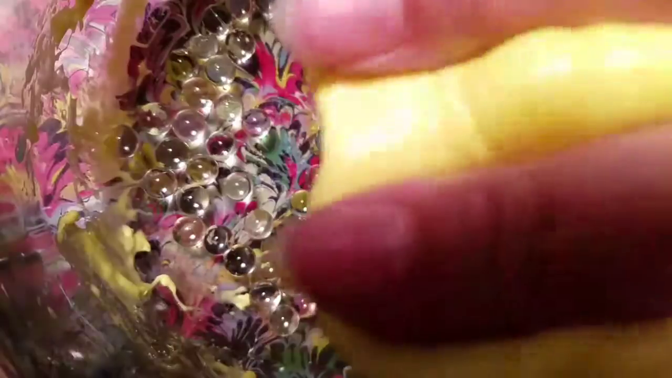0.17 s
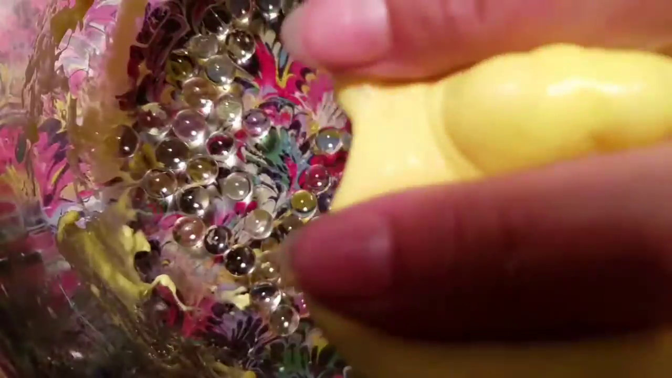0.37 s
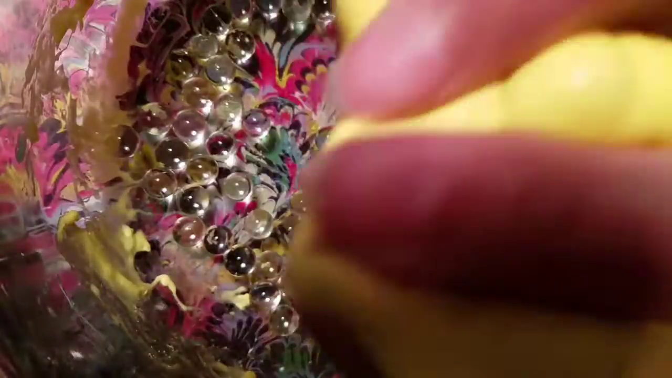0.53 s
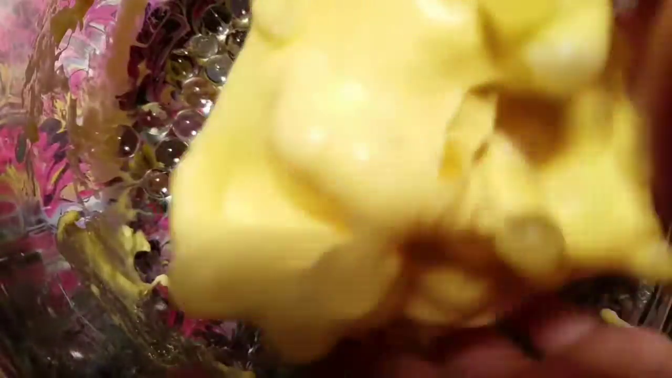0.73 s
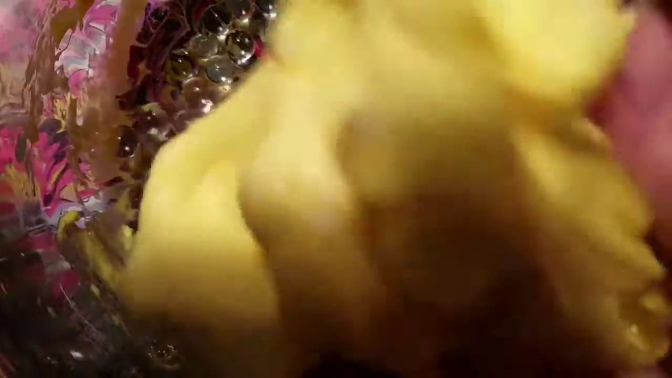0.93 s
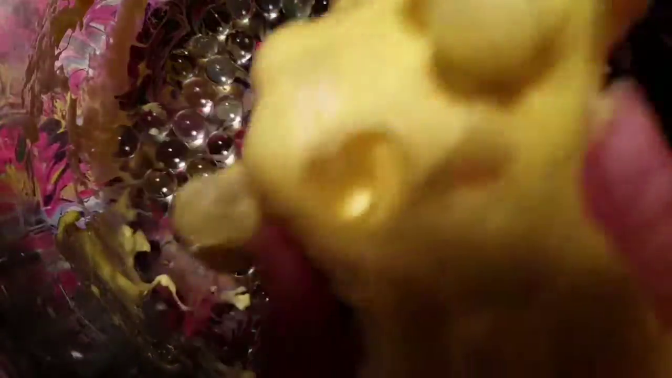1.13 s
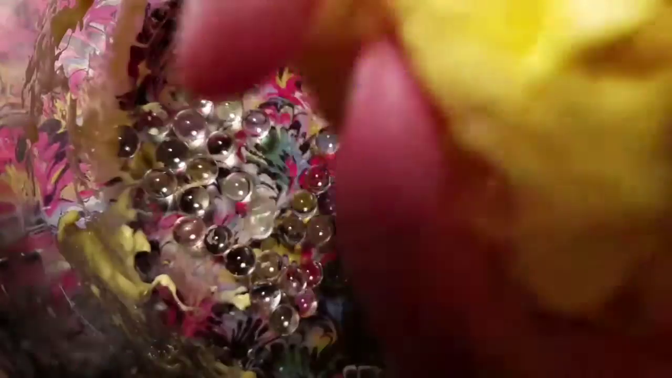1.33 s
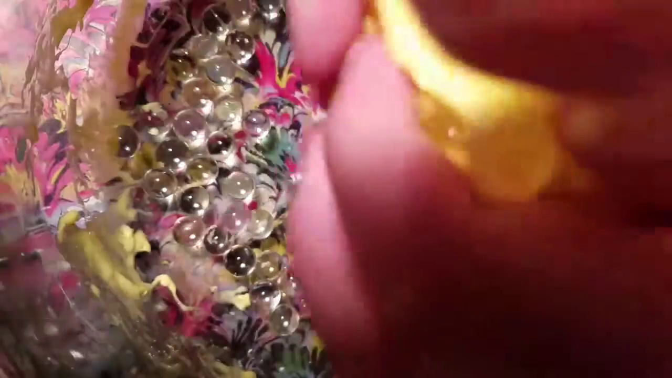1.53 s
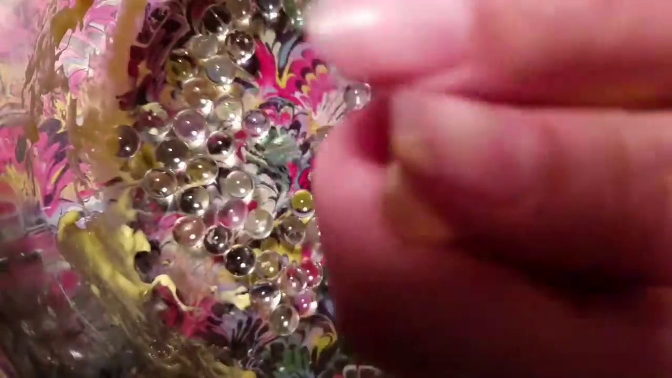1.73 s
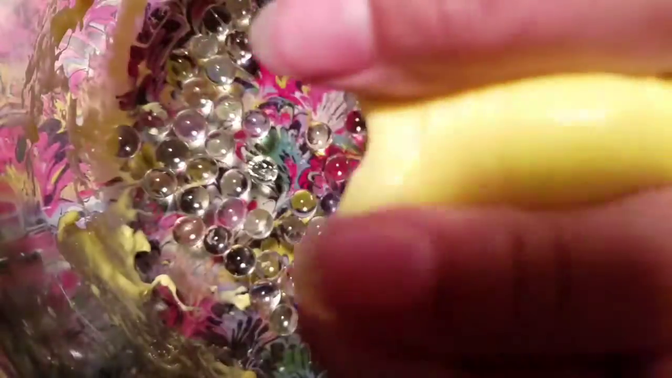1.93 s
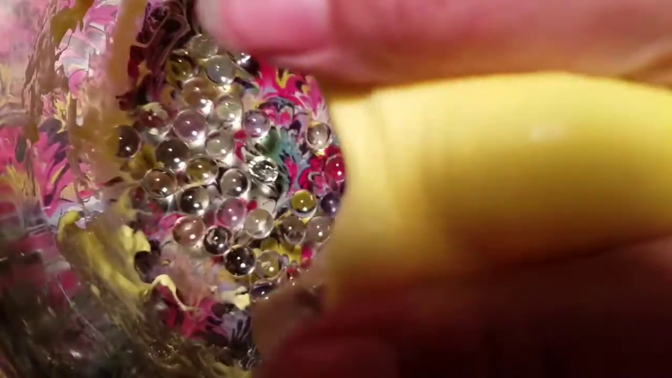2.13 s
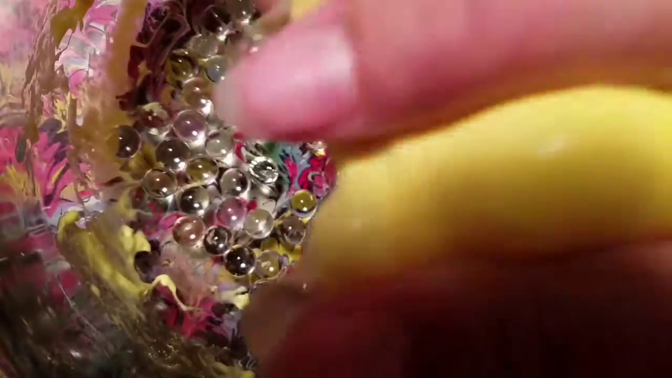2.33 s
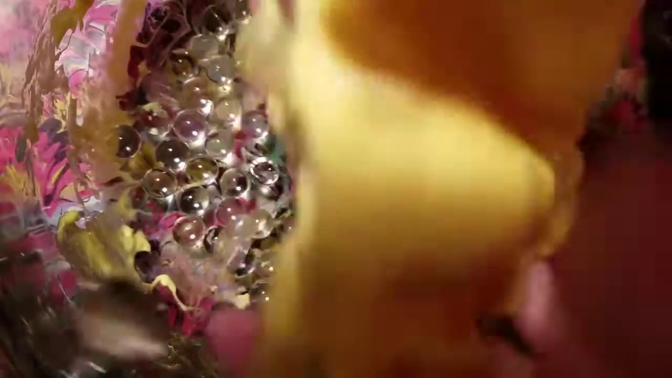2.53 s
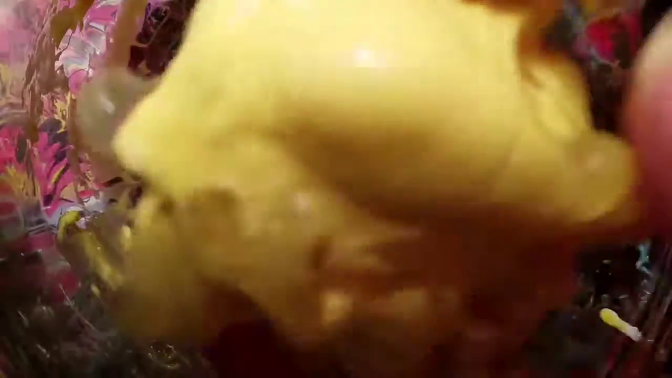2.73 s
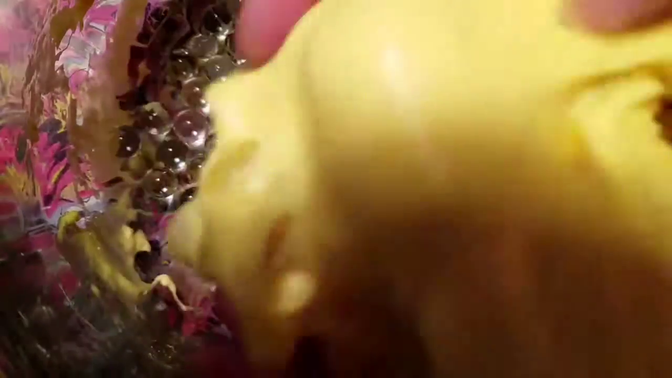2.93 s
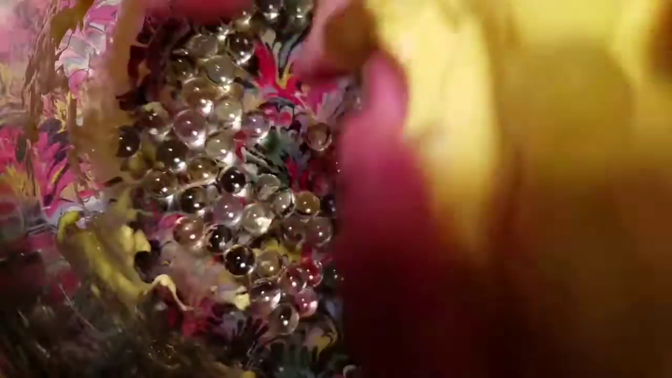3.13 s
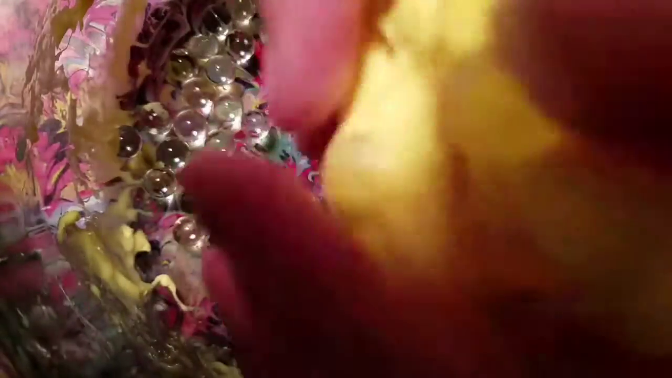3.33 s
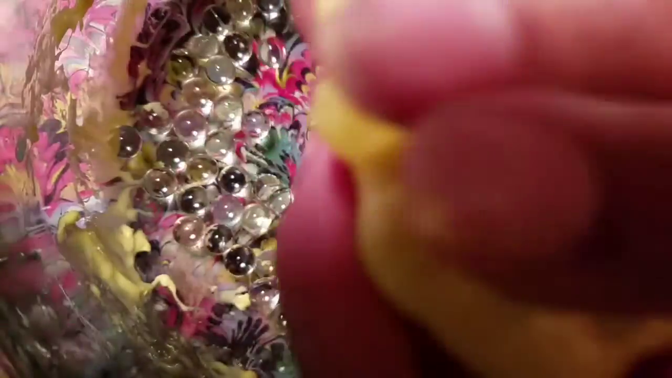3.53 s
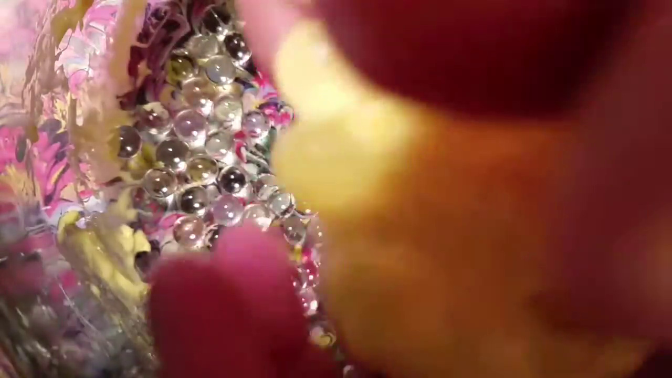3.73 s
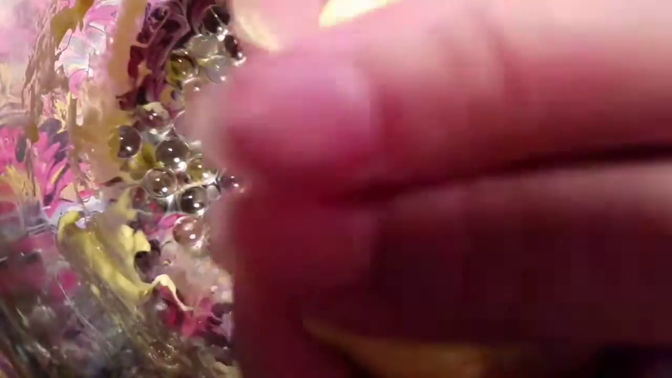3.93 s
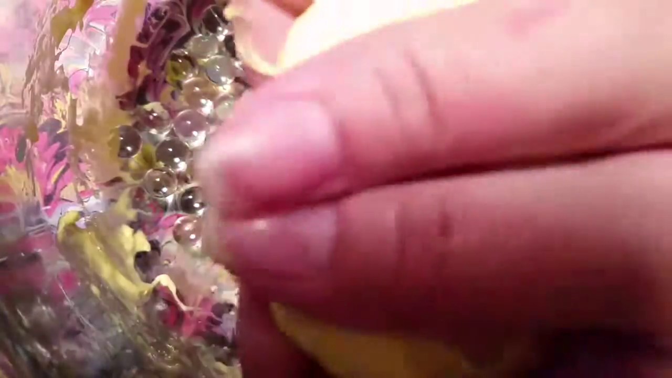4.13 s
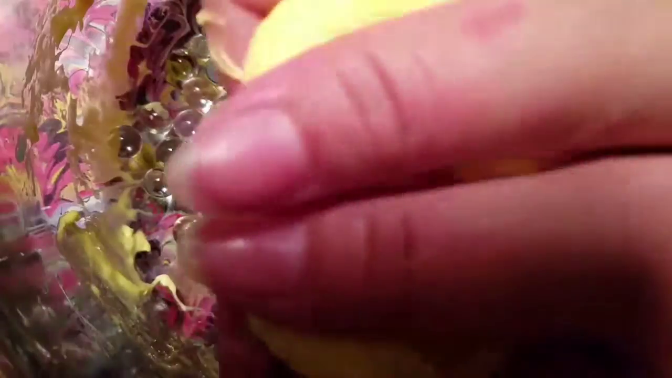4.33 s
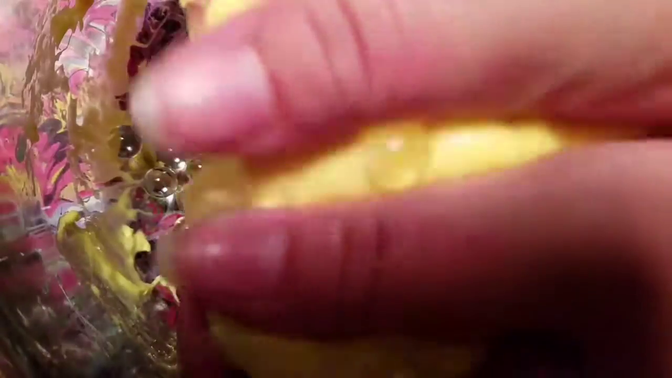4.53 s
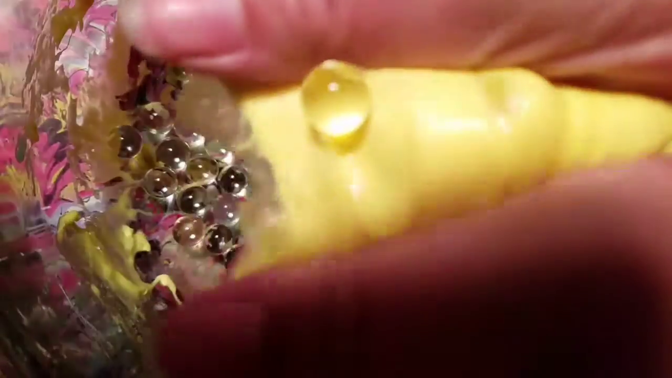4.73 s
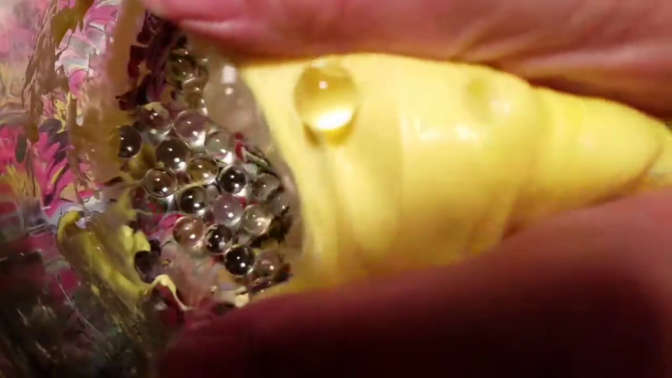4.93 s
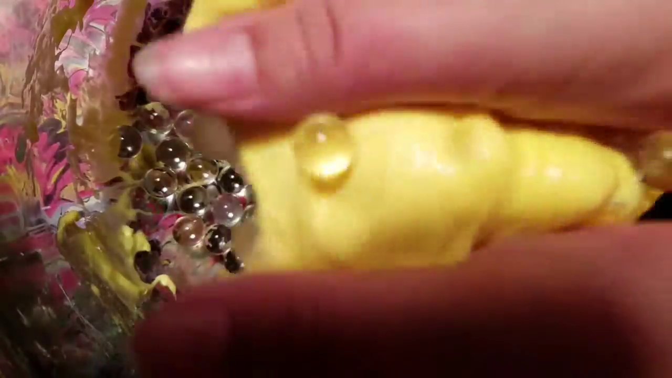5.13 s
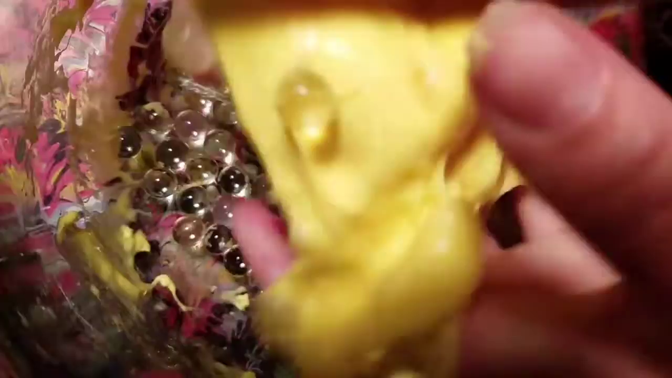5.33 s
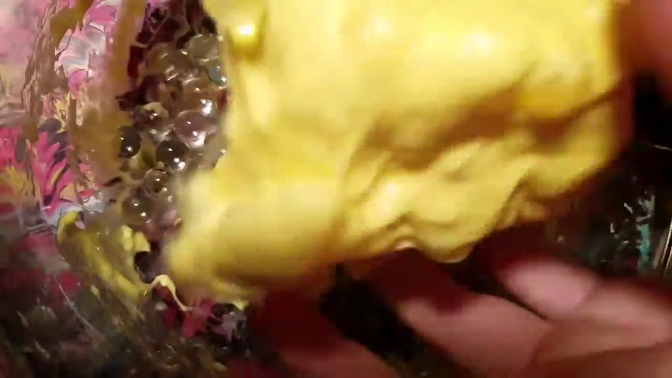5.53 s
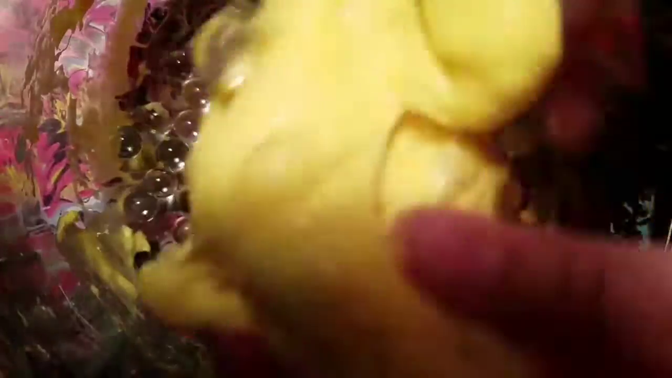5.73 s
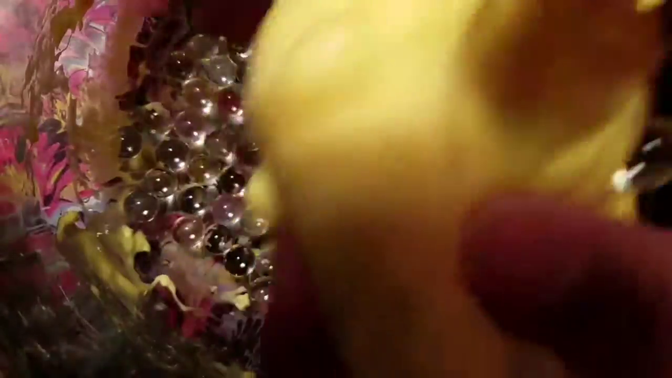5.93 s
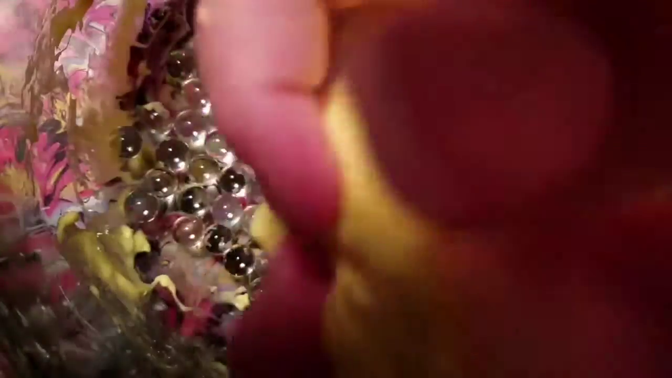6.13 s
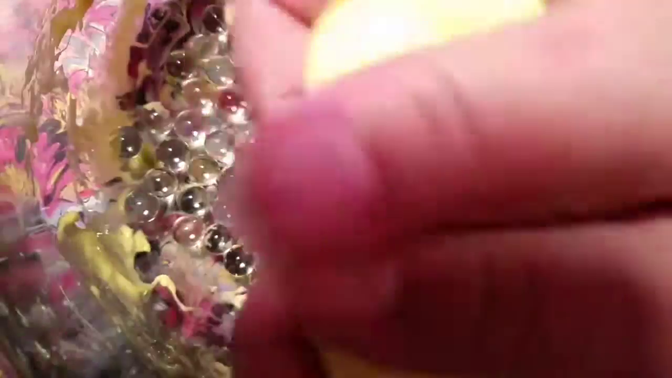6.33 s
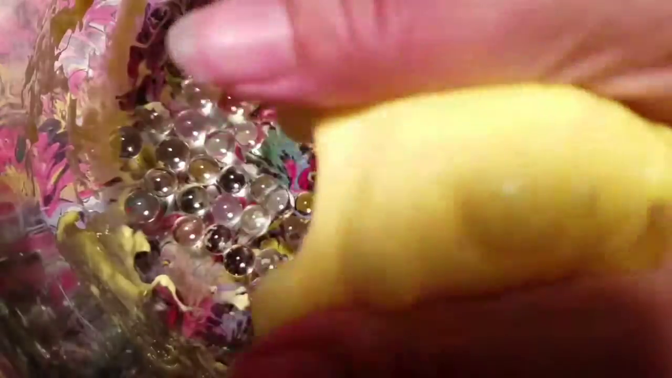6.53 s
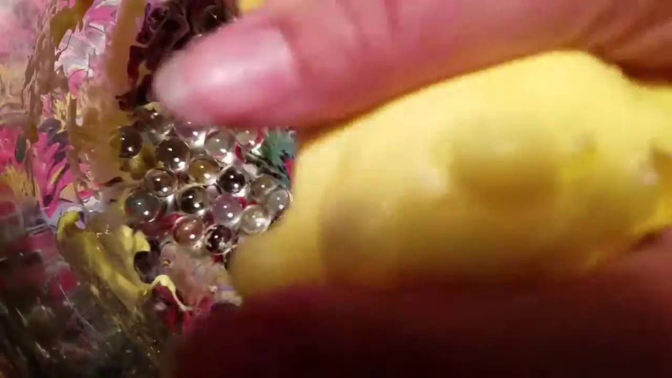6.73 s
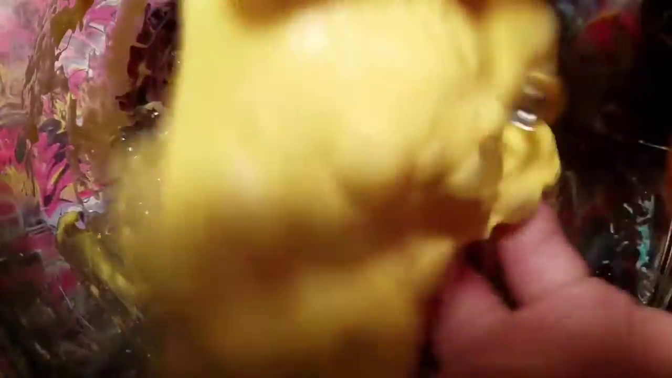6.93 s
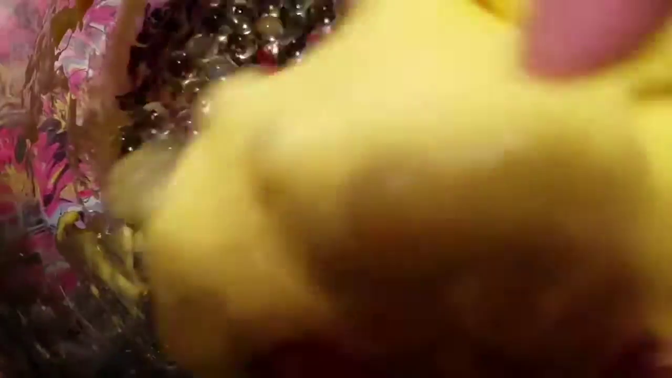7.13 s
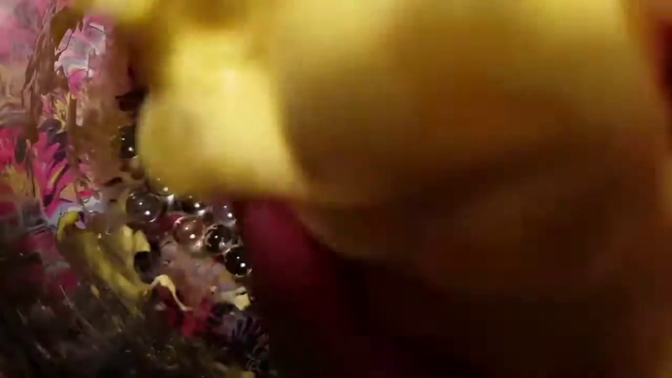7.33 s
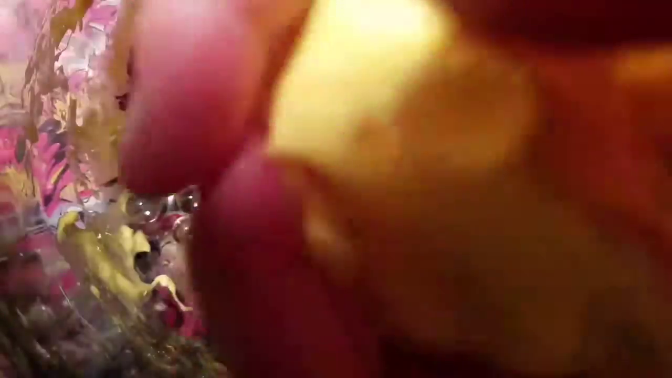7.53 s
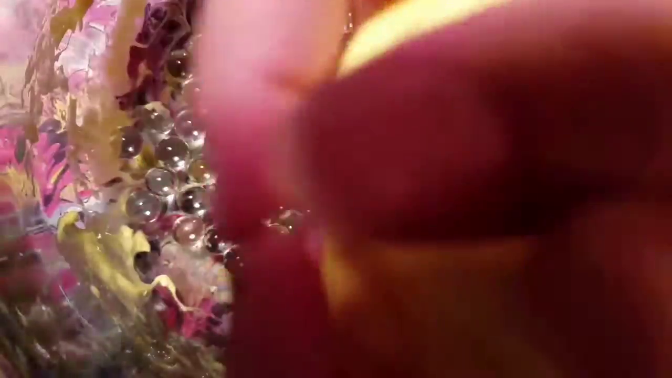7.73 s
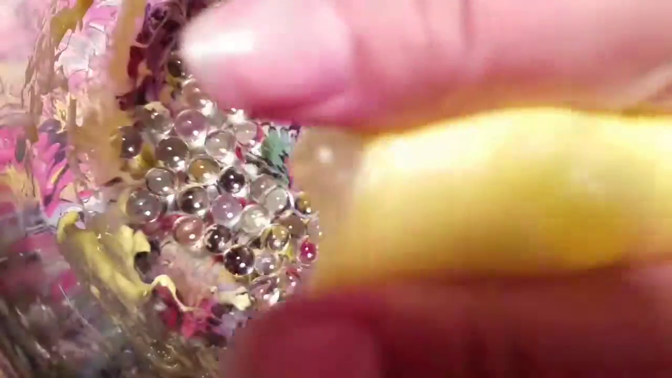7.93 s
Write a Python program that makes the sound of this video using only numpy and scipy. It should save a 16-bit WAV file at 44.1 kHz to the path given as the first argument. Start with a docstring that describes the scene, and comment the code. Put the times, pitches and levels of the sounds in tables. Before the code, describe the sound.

Close, sticky crackling and snapping air pockets as beaded slime is pressed and folded by hand in a quiet room.

```python
"""Sharp pops and a wet crackle: hands knead slime with beads in it over a glass bowl.
The place is a quiet room, with a small stereo microphone close to the hands. Trapped air pockets
burst in the pops, tiny bubbles crackle in each squeeze, and the slime fizzes as it peels off the skin.
The hollow between hands and bowl rings along. Now and then the lump bumps softly and the glass sings."""
import sys
import numpy as np
from scipy import signal
from scipy.io import wavfile

SR = 44100
rng = np.random.default_rng(int(sys.argv[2]) if len(sys.argv) > 2 else 0)


def unload_wav(signal):
    """Save mono or channel-first audio to the path in sys.argv[1] as 16-bit WAV at rate SR, clipped to [-1, 1]."""
    wavfile.write(
        sys.argv[1],
        SR,
        np.round(np.clip(np.atleast_2d(signal).T, -1, 1) * 32767).astype(np.int16),
    )


N = 356328


def from_db(db):
    """Decibels to gain."""
    return 10 ** (np.asarray(db) / 20)


def unit_rms(x):
    """Scale to an rms of 1."""
    return x / np.sqrt(np.mean(x ** 2) + 1e-20)


def band(x, low_hz, high_hz, order=2):
    """Causal band-pass."""
    sos = signal.butter(order, [low_hz, min(high_hz, .45 * SR)], "band", fs=SR, output="sos")
    return signal.sosfilt(sos, x + 1e-18)


def resonate(x, hz, width_hz):
    """One resonance with gain 1 at its peak."""
    b, a = signal.iirpeak(min(hz, .45 * SR), hz / min(width_hz, SR / 3), fs=SR)
    return signal.lfilter(b, a, x + 1e-18)


def left_first(x, lead_ms):
    """The sound reaches the microphone's right port a little after the left."""
    left, right = np.broadcast_to(x, (2, x.shape[-1]))
    at = np.arange(len(right))
    return np.array([left, np.interp(at - np.round(lead_ms * SR / 1000), at, right, left=0)])


def add(out, start_s, sound):
    """Mix a sound in at a time."""
    start = max(round(start_s * SR), 0)
    out[..., start:start + sound.shape[-1]] += sound[..., :max(N - start, 0)]


def room_air(rush_db=-59.5, hum_hz=123, hum_db=-76):
    """The quiet room all round the microphone: a steady rush with a faint mains hum."""
    # Each row: frequency in Hz, relative spectral density in dB.
    spectrum = [(25, -10), (70, -6), (125, -5), (180, -15.5), (350, -1), (620, -8), (800, -16.5),
                (1400, -23), (2600, -23.5), (4000, -32.5), (9500, -34.5), (13800, -30), (16000, -32)]
    # Each row: frequency in Hz, likeness of left and right from 0 to 1.
    likeness = [(30, 0.23), (120, 0.49), (330, 0.96), (640, 0.2), (1400, 0), (15000, 0.17)]
    edges_hz = 22 * 2 ** np.arange(0, 9.6, .5)
    white = rng.standard_normal((2, 2, N))
    rush, sides = 0, np.array([[1], [-1]])
    for k, (low, high) in enumerate(zip(edges_hz, edges_hz[1:])):
        mid, side = band(white[k % 2], low, high, order=3)
        centre = np.sqrt(low * high)
        db, alike = [np.interp(np.log(centre), np.log(hz), values)
                     for hz, values in (np.transpose(spectrum), np.transpose(likeness))]
        pan_db = 1.5 if centre > 800 else -1.6 if centre > 300 else .3
        stereo = np.sqrt(1 + alike) * mid + np.sqrt(1 - alike) * side * sides
        rush = rush + from_db(db + pan_db * sides) * stereo
    hum = np.sqrt(2) * np.sin(2 * np.pi * hum_hz * np.arange(N) / SR)
    return from_db(rush_db) * unit_rms(rush) + from_db(hum_db) * hum


def room_echoes(x, t60_s=.25, delay_s=.007):
    """The walls return a dense dying cloud of reflections, different at each port."""
    t = np.arange(int((t60_s + delay_s) * SR) + 2) / SR
    cloud = rng.standard_normal((2, len(t))) * from_db(-60 * t / t60_s) * (t >= delay_s)
    return signal.fftconvolve(x, unit_rms(cloud) / np.sqrt(len(t)), axes=1)[:, :N]


def glass_bowl():
    """A light touch leaves the bowl under the hands ringing."""
    # Each row: start in seconds, level in dB.
    touches = [(5.404, -58), (6.988, -45)]
    # Each row: frequency in Hz, gain in dB, seconds to die away by 60 dB.
    modes = [(1597, -3.5, 0.8), (2810, 1.5, 0.3)]
    out, t = np.zeros(N), np.arange(SR) / SR
    for start_s, db in touches:
        for hz, mode_db, t60_s in modes:
            add(out, start_s, from_db(db + mode_db - 60 * t / t60_s) * np.sin(2 * np.pi * hz * t))
    return left_first(out, .11)


def lump_bumps(width_hz=75):
    """The soft lump lands with a short dull thud, alike at both ports."""
    # Each row: start in seconds, level in dB, pitch in Hz.
    landings = [(0.829, -52, 226.5), (5.249, -38, 362), (5.451, -43, 340), (5.637, -67, 291.5),
                (6.928, -38, 262), (7.107, -33.5, 343)]
    out, t = np.zeros(N), np.arange(int(.1 * SR)) / SR
    for start_s, db, hz in landings:
        thud = np.sin(2 * np.pi * hz * t) * np.exp(-np.pi * width_hz * t)
        wobble = unit_rms(band(rng.standard_normal(len(t)), 204, 530)) * np.exp(-t / .028)
        add(out, start_s, from_db(db) * (thud + .2 * wobble))
    return band(out, 157, 1200)


def hollow_ring(puff, slop, hz=658, width_hz=66):
    """The air between hands and bowl rings low, over the broad slop of the slime itself; rms 1."""
    # The hollow opens towards the right port: left gain in dB, right gain in dB.
    pan_db = [-5, 6.2]
    ring = band(resonate(puff, hz, width_hz), 454, 967)
    ring = unit_rms(left_first(ring, .48) * from_db(pan_db)[:, None])
    slime = unit_rms(left_first(band(puff, 314, 1020, order=3), .1))
    return unit_rms(ring + slop * slime)


def squeeze_db(from_middle_s, length_s, swell_db=14):
    """Pressure swells to the middle of a squeeze and eases off again."""
    return -swell_db * (2 * from_middle_s / length_s) ** 2


def peel_db(age_s, hold_s, rise_db_per_s=370, sag_db_per_s=35, fall_db_per_s=210):
    """The slime lets go of the skin quickly, keeps peeling for a moment and dies away."""
    return (rise_db_per_s * np.minimum(age_s, 0) - sag_db_per_s * np.clip(age_s, 0, hold_s)
            - fall_db_per_s * np.maximum(age_s - hold_s, 0))


def kneading(resting_db=-76):
    """All strokes over the faint crackle of resting slime: squelch dB, fizz dB, where squeezes lead."""
    # Firm squeezes. Each row: middle in seconds, length in seconds, level in dB, brightness in dB.
    squeezes = [(.15, .52, -48, -1), (2.01, .52, -57, 0), (4.809, .48, -51, 0), (6.521, .42, -50, 1.5),
                (8.01, .24, -49, 0)]
    # Peeling, loud as a squeeze is let go, light while the slime is folded.
    # Each row: peak time in seconds, hold in seconds, level in dB, brightness in dB.
    peels = [(.595, .045, -40.5, -1), (.765, .03, -58, 0), (.86, .03, -63, 1), (1.032, .03, -54, -1),
             (1.32, .04, -59, 2), (1.465, .03, -58, 0), (1.635, .06, -67, 0), (2.415, .11, -46.5, 0),
             (2.81, .02, -58, 0), (2.985, .05, -58, 0), (3.261, .05, -60, 0), (3.65, .02, -64, 2),
             (3.755, .045, -62, 0), (3.954, .015, -68, -4), (5.207, .09, -45, 0), (5.44, .07, -60, 0),
             (5.699, .07, -59, -1), (5.792, .02, -55, 0), (6.035, .09, -59, 1), (6.833, .065, -42, -1),
             (6.98, .13, -58.5, 0.5), (7.25, .05, -55, 0), (7.45, .06, -61, 2), (7.565, .035, -56, 0),
             (7.745, .1, -66, 1)]
    t = np.arange(0, N, 64) / SR
    strokes = [(db + squeeze_db(t - s, length), bright) for s, length, db, bright in squeezes]
    strokes += [(db + peel_db(t - s, hold), bright) for s, hold, db, bright in peels]
    strokes_db = [[db - bright, db + bright] for db, bright in strokes]  # squelch, fizz
    power = from_db(np.maximum(strokes_db, -200)) ** 2
    total = power.sum(axis=0) + from_db(resting_db) ** 2
    share = power[:len(squeezes), 0].sum(axis=0) / total[0]
    squelch_db, fizz_db, share = [np.interp(np.arange(N) / SR, t, curve)
                                  for curve in (*10 * np.log10(total), share)]
    return squelch_db, fizz_db, share > .5


def sticking(steps_per_s=80, depth_db=2.5):
    """The sticky slime gives way in little jerks: a quickly varying gain."""
    steps_db = depth_db * rng.standard_normal(4000)
    return from_db(np.interp(np.arange(N) / SR * steps_per_s, np.arange(len(steps_db)), steps_db))


def bubbles(per_s, low_hz, high_hz, cycles, spread_db, lead_ms, samples=128):
    """Tiny bubbles burst at random, each at a place and pitch of its own, and ring briefly; rms 1."""
    at = np.flatnonzero(rng.random(N) < per_s / SR)
    pitch, strength, place = rng.random((3, len(at), 1))
    hz = low_hz * (high_hz / low_hz) ** pitch
    height = from_db(spread_db * np.minimum(-np.log1p(-strength), 3))
    height *= np.sqrt(hz / per_s[at, None])  # even power at any pitch and rate
    height *= rng.choice([-1, 1], height.shape)
    steps, ports = np.arange(samples), []
    for lag_ms in (0, lead_ms * (.5 + place)):
        turns = hz * np.maximum(steps / SR - lag_ms / 1000, 0)
        rings = height * np.sin(2 * np.pi * turns) * from_db(-60 * turns / cycles)
        ports.append(np.bincount((at[:, None] + steps).ravel(), rings.ravel(), N)[:N])
    return unit_rms(np.array(ports))


def scattered(ticks, low_hz, high_hz, fade_ms=1.56):
    """Moving fingers and glass throw each tick back a new way: a brief diffuse tail follows it."""
    decay = np.exp(-1000 / (fade_ms * SR))
    energy = signal.lfilter([1 - decay], [1, -decay], np.mean(ticks ** 2, axis=0))
    tail = band(np.sqrt(energy) * rng.standard_normal((2, N)), low_hz, high_hz)
    direct = band(ticks, .61 * low_hz, 2.1 * high_hz)
    return unit_rms(unit_rms(direct) + unit_rms(tail))


def crackle(squelch_db, fizz_db, squeezing):
    """Bubbles burst under the fingers, sparse and distinct in a squeeze, dense and soft in a peel."""
    per_s = np.where(squeezing, 200, 1500) * from_db(.55 * (squelch_db + 50))
    squelch = bubbles(per_s, 1030, 4330, cycles=16.6, spread_db=4, lead_ms=.12, samples=320)
    squelch = scattered(squelch, 820, 3780)
    snap = bubbles(per_s, 2700, 7600, cycles=20, spread_db=5, lead_ms=.336, samples=80)
    snap = scattered(snap, 1950, 8500)
    fizz = bubbles(2.4 * per_s, 9700, 14600, cycles=2.8, spread_db=7, lead_ms=.17, samples=48)
    fizz = scattered(fizz, 10300, 21000)
    puffs = bubbles(2 * per_s, 710, 1450, cycles=1.4, spread_db=0, lead_ms=0)[0]
    low = from_db(-1) * (squelch + hollow_ring(puffs, slop=.48))
    high = from_db(-4) * snap + from_db(-3) * fizz
    return from_db(squelch_db) * low + from_db(fizz_db) * high


def tear(t, decay_ms, scatter):
    """A film rips: one click, then uneven smaller rips and reflections off fingers and glass."""
    age = t * 1000 / decay_ms
    rips = rng.standard_normal((2, len(t))) * from_db(2.8 * rng.standard_normal(len(t)))
    envelope = np.exp(-age) * (1.15 - np.exp(-4 * age))
    return unit_rms(t == 0) + scatter * unit_rms(rips * envelope)


def pops(rows, pocket_q=8, overtone_ratio=2.73, overtone_q=7):
    """Each rip snaps and fizzes, rings its air pocket with one overtone and puffs into the hollow."""
    out, t = np.zeros((2, N)), np.arange(int(.05 * SR)) / SR
    level_scale = np.sqrt(.01 / t[-1])  # levels count as rms over 10 ms
    for start_s, puff_ms, hz, db, bright_db, hollow_db in rows:
        rip = tear(t, 2.24 * puff_ms, scatter=3.5 * np.sqrt(puff_ms))
        puff = tear(t, puff_ms, scatter=.68 * np.sqrt(puff_ms))[0]
        lead_ms = rng.uniform(.25, .45)
        tone = unit_rms(left_first(resonate(puff + 1.24 * rip, hz, hz / pocket_q), .13))
        smack = .9 * hz ** 4 / (hz ** 4 + 2400 ** 4)  # large, low pockets ring purest
        pocket = band(tone + smack * unit_rms(band(rip, 930, 6400)), 1200, 4190, order=3)
        overtone = resonate(rip, overtone_ratio * hz, overtone_ratio * hz / overtone_q)
        snap = unit_rms(band(rip, 3120, 8130, order=3)) + .68 * unit_rms(overtone)
        fizz = band(rip, 9900, 21200, order=3)
        sound = from_db(hollow_db) * hollow_ring(puff, slop=.21)
        sound += from_db(db - bright_db) * unit_rms(pocket)  # brightness trades pocket for fizz
        sound += from_db(db) * unit_rms(left_first(snap, lead_ms))
        sound += from_db(db + bright_db) * unit_rms(left_first(fizz, lead_ms))
        add(out, start_s, level_scale * sound)
    return out


def small_pops(squelch_db, candidates=600, low_hz=1264, high_hz=3500, spread_db=2.5):
    """Small pockets burst at random, more often and louder the harder the slime is worked."""
    when, chance, pitch, length = rng.random((candidates, 4)).T
    strength, bright, hollow = rng.uniform(-1, 1, (candidates, 3)).T
    effort_db = squelch_db[(when * N).astype(int)] + 50
    per_s = 17 * from_db(.44 * effort_db)
    db = -57.5 + .74 * effort_db + spread_db * strength
    hz = low_hz * (high_hz / low_hz) ** pitch
    puff_ms = 1.14 * (.5 + length)
    bright_db = 1 + 14 * bright
    hollow_db = db + 5 + spread_db * hollow
    rows = np.transpose([when * N / SR, puff_ms, hz, db, bright_db, hollow_db])
    return pops(rows[chance < per_s * N / SR / candidates])


def sharp_pops():
    """Trapped air pockets burst clear of the crackle, right in front of the microphone."""
    # Each row: start in seconds, puff decay in ms, pocket pitch in Hz, level in dB,
    # brightness in dB, level of the hollow in dB.
    pockets = [(0.0403, 1.3, 2750, -51.5, -7, -44), (0.0778, 0.98, 1640, -51, -18, -42),
               (0.091, 1.7, 1490, -39.5, -10, -37.5), (0.1072, 0.86, 1660, -38.5, 5, -36),
               (0.1119, 3, 1490, -38, -15, -34), (0.1206, 9.4, 1610, -38.5, -9, -38),
               (0.1674, 0.55, 2900, -40, 0, -45), (0.178, 1.5, 2320, -48, -11, -63),
               (0.1966, 3.2, 1560, -53, -13, -53), (0.2343, 0.3, 2740, -43, 1, -60),
               (0.2614, 1.2, 2730, -42, 2, -60), (0.2983, 0.98, 2440, -47, -2, -60),
               (0.3278, 0.93, 2770, -46, 9.5, -61), (0.5612, 1.4, 2720, -47, 1, -32.5),
               (0.596, 0.71, 2500, -52, -11, -38), (0.6111, 1.5, 2400, -45.5, -8, -35.5),
               (0.9443, 0.66, 1850, -65, -6, -59), (1.0052, 1.4, 2130, -60.5, -7.5, -68),
               (1.4656, 1.5, 1440, -65, -8.5, -59), (1.6365, 0.98, 1450, -65.5, -8, -67),
               (1.7624, 0.92, 1450, -57.5, 0.5, -51), (1.806, 0.73, 1480, -44, 4.5, -42),
               (1.8159, 1.6, 2800, -41, 6.5, -41), (1.8402, 1, 2840, -40.5, 4.5, -36),
               (1.8823, 0.96, 2700, -47, 6, -51), (1.8968, 1.5, 2750, -52.5, -4.5, -45.5),
               (1.9422, 2.2, 2400, -47.5, -8.5, -48), (1.9645, 1.1, 2360, -46.5, 0, -62),
               (1.9973, 0.47, 2700, -43, 0.5, -39.5), (2.0539, 0.66, 4000, -40, -3.5, -40),
               (2.1471, 4.1, 2360, -62, -23, -48), (2.1584, 1.7, 3670, -42, 9, -60),
               (2.1683, 2.1, 3400, -31.5, 10, -50), (2.1809, 8.7, 3430, -38, -1.5, -56),
               (2.1926, 2.3, 3830, -38.5, -1.5, -39.5), (2.2588, 0.97, 1180, -44.5, -6, -32.5),
               (2.3103, 1, 2300, -70, -18.5, -71), (2.3863, 3.7, 2810, -55.5, -2, -36),
               (2.5197, 1.3, 2100, -42.5, 1.5, -39.5), (2.7532, 1.3, 1330, -55, 0.5, -53),
               (2.8199, 1.8, 3830, -52.5, -5.5, -47), (3.0189, 0.53, 3630, -60, 3, -74),
               (3.285, 1.2, 2635, -59.5, 3.5, -55), (3.787, 0.71, 3180, -70, -11, -72),
               (3.96, 1.7, 1350, -83, -25, -52), (4.1369, 0.66, 2110, -28, -0.5, -17.5),
               (4.3922, 0.77, 3160, -42.5, 7, -49), (4.5831, 0.94, 1330, -61.5, -14.5, -52),
               (4.6146, 1.3, 1580, -63, 17, -47), (4.6723, 0.98, 2700, -40.5, 10, -41),
               (4.7775, 2, 2700, -48, 5, -62), (4.7949, 3.3, 2810, -55.5, -10.5, -58),
               (4.8175, 1.6, 2720, -57, -8, -64), (4.8373, 0.34, 2840, -37, 9.5, -46),
               (4.8418, 1.6, 2700, -37.5, 11.5, -44), (4.9085, 1.4, 1410, -47, 6, -46),
               (4.9313, 0.58, 1380, -61, -9, -66), (5.0237, 1.6, 2900, -53, -10.5, -50),
               (5.219, 2.1, 2370, -48, -7, -37.5), (5.259, 0.61, 3135, -42.5, 3, -38),
               (5.3024, .9, 1830, -52, -7, -50), (5.4654, 1, 2810, -70, -12, -48.5),
               (5.794, 1.8, 2900, -53.5, 1, -51), (5.812, .6, 3000, -54, -1.5, -58),
               (6.3264, .7, 2840, -60.5, -6, -47.5), (6.4108, 1, 1260, -45, -1.5, -38),
               (6.4429, 1.1, 2490, -48, -7.5, -42.5), (6.4926, 1.5, 2780, -54, 15, -67),
               (6.5312, 4.1, 1290, -43.5, 4.5, -45), (6.5441, 0.79, 2860, -43.5, -7, -42),
               (6.6483, 4.2, 1360, -43.5, -4, -38), (6.6621, .7, 1350, -44.5, -0.5, -37.5),
               (6.7118, 4, 2800, -40.5, 3.5, -47), (6.746, 1.1, 1540, -46.5, -7, -44.5),
               (6.8271, 1.3, 2500, -40.5, -6, -35), (7.0758, 7.1, 1410, -49, -6.5, -44),
               (7.7754, 0.32, 1290, -66, 14.5, -58), (7.879, 1.35, 1480, -42, 0, -42),
               (7.9159, .8, 2270, -55.5, -15, -45), (7.9334, 1.1, 3430, -53, -19.5, -53),
               (7.946, .5, 3570, -30.5, 1.5, -35), (8.0113, 0.61, 2800, -35.5, 5, -64),
               (8.0248, 0.6, 2930, -40.5, -0.5, -36.5)]
    return pops(pockets)


def microphone_ports(stereo):
    """Each port of the microphone colours the close sound with peaks and dips of its own."""
    # Each row: centre in Hz, width in Hz, gain in dB.
    left_colour = [(1480, 40, 6), (12800, 13100, 5)]
    right_colour = [(1150, 600, -7.5), (1410, 98, 8.5), (2700, 386, 7), (8850, 12000, -3)]
    channels = []
    for x, colour in zip(stereo, (left_colour, right_colour)):
        for hz, width_hz, db in colour:
            x = x + (from_db(db) - 1) * resonate(x, hz, width_hz)
        channels.append(x)
    return np.array(channels)


def scene(room_db=-18.5):
    """Slime and bowl close to the microphone, with a little of the room behind them."""
    squelch_db, fizz_db, squeezing = kneading()
    air, thuds, uneven = room_air(), lump_bumps(), sticking()
    slime = sharp_pops() + small_pops(squelch_db) + uneven * crackle(squelch_db, fizz_db, squeezing)
    near = microphone_ports(slime) + thuds + glass_bowl()
    return near + from_db(room_db) * room_echoes(near) + air


def record(dry):
    """The top is cut steeply above 14.7 kHz."""
    return signal.sosfilt(signal.ellip(10, .2, 70, 14700, fs=SR, output="sos"), dry)


dry = scene()
out = record(dry)
unload_wav(out)
```